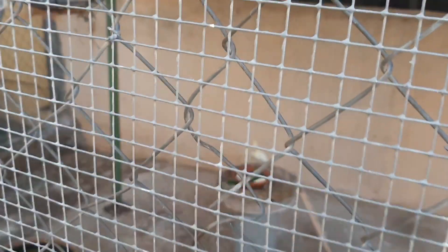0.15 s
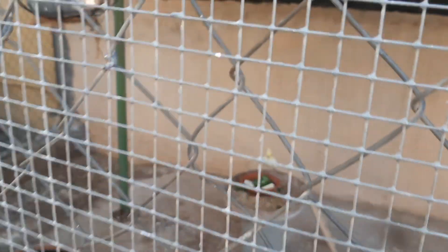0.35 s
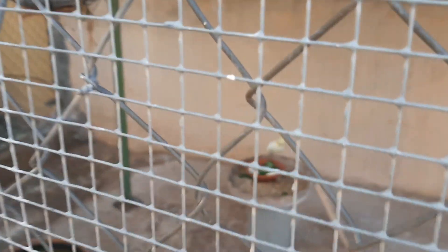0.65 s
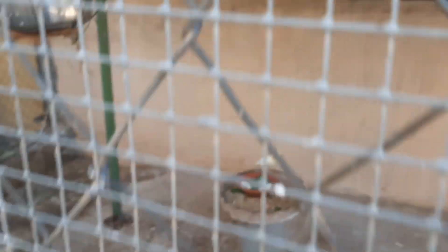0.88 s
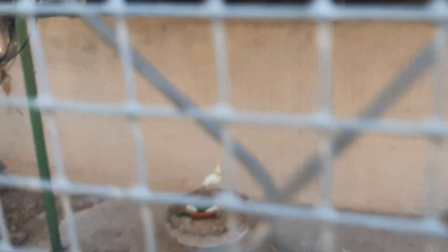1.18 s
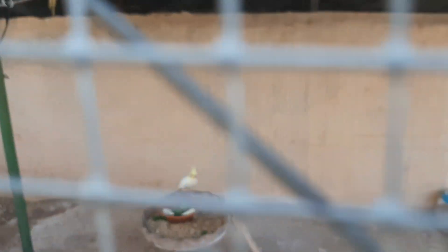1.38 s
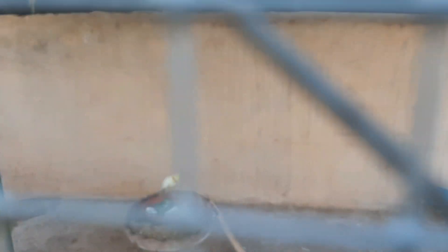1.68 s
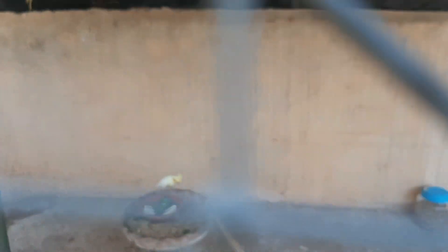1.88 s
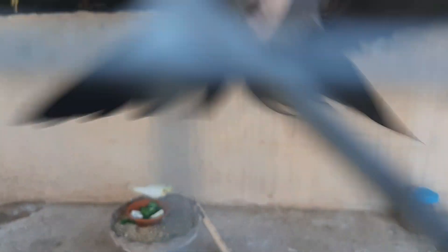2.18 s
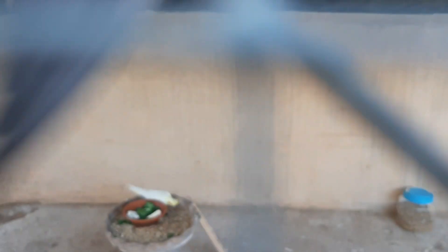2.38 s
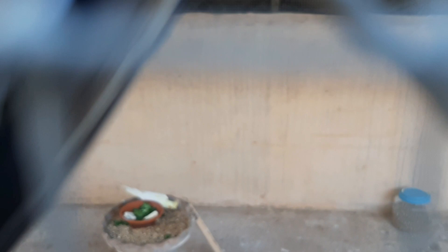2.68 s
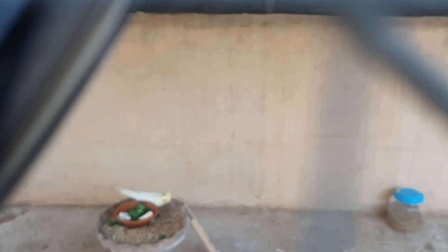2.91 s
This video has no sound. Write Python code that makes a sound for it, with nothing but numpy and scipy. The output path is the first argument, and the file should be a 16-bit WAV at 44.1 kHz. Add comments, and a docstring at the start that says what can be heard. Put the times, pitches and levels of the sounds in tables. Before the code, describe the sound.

Wing flutters from small parrots close by, broken by a hard bump and a brief warbling squawk.

```python
"""Parrots against the aviary mesh

Small parrots in a walled outdoor aviary: enveloped noise for wings, wind, hoarse bird sounds and a short
scuffle of feet, over a low outdoor rumble. Damped modes give perch knocks, wire pings and a sharp thump
on the right. Harmonic voices with moving pitch give far calls, a rough chirp and a near squawk that leaps
up and falls. Sound reaches a left and a right microphone port, with a diffuse answer from the walls."""
import sys
import numpy as np
from scipy import signal
from scipy.fft import rfft, irfft, next_fast_len
from scipy.io import wavfile
from scipy.ndimage import map_coordinates

SR = 44100
rng = np.random.default_rng(int(sys.argv[2]) if len(sys.argv) > 2 else 0)


def digitize_waveform(pressure):
    """Quantize a signal to 16-bit integers and store it at the path in sys.argv[1].

    Rows of a 2-D input are taken as channels; values are limited to [-1, 1].
    """
    field = np.atleast_2d(pressure).T
    bounded = np.clip(field, -1, 1)
    quanta = np.round(bounded * 32767).astype(np.int16)
    wavfile.write(sys.argv[1], SR, quanta)


N = 134505
TOP_HZ = 15900  # upper band limit

# treble response of the microphone, with a dip near 9 kHz: frequency_hz, gain_db
MICROPHONE = [(7700, 0), (8700, -15), (9700, -20), (11000, -1.5), (15000, -5.5)]


def amp(db):
    """Level: decibels to an amplitude ratio."""
    return 10 ** (np.asarray(db) / 20)


def unit(x):
    """Normalisation: scale each channel to rms 1."""
    return x / np.sqrt(np.mean(x ** 2, axis=-1, keepdims=True) + 1e-20)


def clock():
    """Sampling: the time of each sample in seconds."""
    return np.arange(N) / SR


def pan(left_minus_right_db):
    """Interaural level difference: left and right gains, shared evenly."""
    return amp(np.array([[left_minus_right_db], [-left_minus_right_db]]) / 2)


def along(points, hz):
    """Interpolation of (frequency, value) points along a logarithmic frequency axis."""
    f, v = np.transpose(points)
    return np.interp(np.log(hz + 1), np.log(f + 1), v)


def wobble(rate):
    """Random modulation: a smooth curve through rate random knots a second."""
    return map_coordinates(rng.standard_normal(N // 4), [clock() * rate], mode="wrap")


def filtered(x, response):
    """Linear filtering: multiply the spectrum by a response of frequency."""
    m = next_fast_len(N + SR // 2)
    frequency_hz = np.fft.rfftfreq(m, 1 / SR)
    return irfft(rfft(x, m) * response(frequency_hz), m)[..., :N]


def noise(spectrum, alike=0):
    """Partial coherence: coloured stereo noise of rms 1, sharing the power fraction alike."""
    w = rng.standard_normal((3, N))
    share = np.clip(alike, 0, 1)
    stereo = w[:2] * np.sqrt(1 - share) + w[2] * np.sqrt(share)
    return unit(filtered(stereo, lambda hz: amp(along(spectrum, hz))))


def swell(s, width):
    """Gaussian envelope: a bell centred on s with standard deviation width, in seconds."""
    return np.exp(-.5 * ((clock() - s) / width) ** 2)


def decay(s, t60):
    """Exponential decay: a sudden start at s, falling 60 dB in t60 seconds."""
    t = clock() - s
    return (t >= 0) * np.exp(-np.log(1000) * np.abs(t) / t60)


def ring(s, modes):
    """Modal superposition: damped sinusoids all struck at s."""
    return sum(amp(db) * decay(s, t60) * np.sin(2 * np.pi * hz * (clock() - s)) for hz, db, t60 in modes)


def placed(x, pan_db, wet_db):
    """Arrival-time difference and reverberation: right port first, plus a decaying diffuse tail."""
    # reverberation time of the walls: frequency_hz, t60_s
    walls = [(200, .3), (3000, 0.32), (6000, 0.32), (14000, 0.13)]
    hz, t, z = signal.stft(rng.standard_normal((2, SR // 2)), SR, nperseg=256)
    fade = np.exp(-np.log(1000) * t / along(walls, hz)[:, None])
    tail = signal.istft(z * fade, SR, nperseg=256)[1]
    tail = np.pad(tail / np.linalg.norm(tail[0]), ((0, 0), (200, 0)))  # 4.5 ms before the first answer
    x = x * np.ones((2, 1))
    wet = signal.fftconvolve(x, tail, axes=1)[:, :N]
    direct = np.array([np.pad(x[0], (20, 0))[:N], x[1]])  # left is 20 samples late
    return pan(pan_db) * (direct + amp(wet_db) * wet)


def voice(curve, partials_db, jitter, rough):
    """Source and filter: unsteady syrinx harmonics, brighter when louder, through the throat."""
    # resonance of the throat: frequency_hz, gain_db
    throat = [(1500, -2), (3700, -0.5), (5500, -5.5), (7700, -6.5), (8700, -24), (11000, -11), (15000, -14)]
    brighten = .4  # dB gained by overtones per dB of loudness
    s, hz, db = np.transpose(curve)
    pitch = np.interp(clock(), s, hz) * (1 + jitter * wobble(500))
    phase = 2 * np.pi * np.cumsum(pitch) / SR
    level_db = np.interp(clock(), s, db)
    bright = amp(brighten * (level_db - db.max()))
    tone = 0
    for k, partial_db in enumerate(partials_db, 1):
        partial = amp(partial_db) * np.sin(k * phase) * (k * pitch < TOP_HZ)
        tone = tone + partial * (bright if k > 1 else 1)
    level = amp(level_db) * (clock() > s[0]) * (clock() < s[-1])
    rough_tone = level * tone * (1 + rough * wobble(1800))
    return filtered(rough_tone, lambda f: amp(along(throat, f)))


def outdoors():
    """Ambient sound field: a steady, nearly coherent rumble and a more diffuse, slowly varying wash."""
    # spectrum of the rumble: frequency_hz, relative_db
    rumble = [(20, -25), (40, -8), (62, 4.5), (80, -2.5), (110, -11.5), (200, -27.5), (500, -59)]
    # spectrum of the wash: frequency_hz, relative_db
    air = [(20, -27), (50, -0.5), (150, -0.5), (350, -3), (600, -7), (900, -7), (1250, -15), (1600, -10.5),
           (2150, -12.5), (2900, -25.5), (5000, -24.5), (7500, -34.5), (8700, -56), (9800, -41),
           (12000, -34), (16000, -32)]
    # loudness of the wash before panning: time_s, level_db
    air_level = [(0, -48.5), (1.1, -50), (2.1, -45.5), (2.6, -49.5), (3.05, -54)]
    wash = amp(np.interp(clock(), *np.transpose(air_level))) * noise(air, alike=0.27)
    return amp(-47) * pan(-3.0) * noise(rumble, alike=0.94) + pan(-4.5) * wash


def wings():
    """Aerodynamic noise: strokes make grainy feather swishes; the nearest also sweep air."""
    # wing strokes before placement: peak_s, level_db
    strokes = [(0.018, -47), (.12, -48), (0.217, -46), (.32, -47), (.43, -49), (1.584, -43), (1.675, -42.5),
               (1.764, -41), (1.871, -42.5), (1.969, -43), (2.05, -42.5), (2.12, -43), (2.18, -40.5),
               (2.338, -42.5), (2.385, -38.5), (2.44, -42.5), (2.48, -52), (2.932, -58.5), (3.025, -67)]
    # spectrum of the feathers: frequency_hz, relative_db
    feathers = [(300, 1.5), (1500, -0.5), (2800, 0), (5000, -1), (7600, 0.5), (8700, -12.5), (9800, -8),
                (11500, -0.5), (15500, 1.5)]
    # air swept by the nearest strokes: peak_s, relative_db
    whooshes = [(1.8, -40.5), (1.91, -46), (2.004, -34.5), (2.106, -34.5)]
    # spectrum of the swept air: frequency_hz, relative_db
    swept_air = [(100, 4), (400, -4), (800, -6), (1400, -0.5), (2600, -7.5), (4500, -9.5), (8000, -25),
                 (15000, -38)]
    rise_s, fall_s = 0.014, 0.054
    t = clock()
    power = 0
    for s, db in strokes:
        envelope = np.where(t < s, swell(s, rise_s), np.exp(-np.abs(t - s) / fall_s))
        power = power + (amp(db) * envelope) ** 2
    grain = unit(noise(feathers, alike=0.13) * amp(2.0 * wobble(600)))
    swish = np.sqrt(power) * grain
    sweep = sum(amp(db - 4) * swell(s, 0.0098) for s, db in whooshes)
    whoosh = sweep * noise(swept_air, alike=0.28)
    return placed(swish + whoosh, pan_db=-5.5, wet_db=-8)


def rasps_and_scuffle():
    """Band-limited noise: Gaussian bands give hoarse bird sounds and a short scuffle of feet."""
    # noise bursts before placement, the one at .83 s a scuffle:
    # centre_s, duration_sigma_s, centre_hz, bandwidth_sigma_hz, level_db
    bursts = [(.2, .09, 5400, 180, -66), (.62, 0.12, 5640, 450, -63.5), (.83, 0.035, 5150, 1400, -59),
              (1.14, 0.041, 4300, 300, -58), (1.17, .035, 5370, 330, -51), (1.194, 0.021, 1950, 503, -46.5),
              (1.199, 0.012, 3100, 230, -35.5), (1.198, 0.0096, 5150, 450, -45.5),
              (1.215, 0.032, 6030, 3560, -56.5), (1.26, 0.074, 4500, 755, -56),
              (1.55, 0.018, 4670, 150, -55), (2.4, 0.03, 5200, 1100, -46), (2.482, 0.011, 3700, 220, -41.5)]

    def band(hz, width):
        """Spectral shaping: a Gaussian noise band heard through the microphone response."""
        def response(f):
            return amp(along(MICROPHONE, f)) * np.exp(-.5 * ((f - hz) / width) ** 2)
        return unit(filtered(rng.standard_normal(N), response))

    bands = sum(amp(db) * swell(s, length) * band(hz, width) for s, length, hz, width, db in bursts)
    return placed(bands, pan_db=-3, wet_db=-3)


def claw_ticks():
    """Impact noise: claws tick the wire as short, broadband decays."""
    # claw ticks, level before panning: start_s, level_db, left_minus_right_db
    ticks = [(0.395, -40, -1), (2.342, -32, 6), (2.398, -23, 16), (2.4023, -29, 13.5), (2.928, -52.5, -9)]
    return sum(amp(db) * pan(side) * decay(s, 0.014) for s, db, side in ticks) * noise(MICROPHONE)


def far_calls():
    """Distance cue: a wavering whistle and a nasal call with more reverberant than direct gain."""
    # whistle contour before placement: time_s, pitch_hz, level_db
    whistle = [(.47, 5000, -61), (.5, 5200, -53.5), (.53, 5850, -53), (.565, 5850, -61), (.6, 5760, -51.5),
               (.645, 5850, -65), (.68, 5710, -51.5), (.72, 5730, -67), (.76, 5850, -55), (.8, 5600, -73),
               (.86, 5390, -51.5), (.9, 5350, -65), (.99, 5250, -64)]
    # nasal contour before placement: time_s, pitch_hz, level_db
    nasal = [(2.77, 660, -68), (2.805, 638, -57.5), (2.85, 575, -66)]
    # harmonics of the nasal call, fundamental first: relative_db
    nasal_partials = [-25, -20, -13, -1.5, -4.5, -6, -7, -8, -8, -11, -14, -10]
    calls = voice(whistle, [0], jitter=0.01225, rough=0.36)
    calls = calls + voice(nasal, nasal_partials, jitter=0.0081, rough=.2)
    return placed(calls, pan_db=-4.0, wet_db=4.0)


def perch_knocks():
    """Modal excitation: feet knock on a perch and set its damped modes ringing."""
    # knocks before placement: start_s, level_db
    knocks = [(.792, -35), (.823, -36), (.831, -42)]
    # modes of the perch: frequency_hz, relative_db, t60_s
    perch = [(328, -6, 0.065), (405, -3, 0.042), (550, -7, .04), (910, -8, .03), (1410, -7, 0.028)]
    return placed(sum(amp(db) * ring(s, perch) for s, db in knocks), pan_db=-1.5, wet_db=-8)


def chirp():
    """Frequency modulation: a brief, rough, nearly pure tone on an unsteady pitch."""
    # chirp contour before placement: time_s, pitch_hz, level_db
    contour = [(1.183, 3000, -43), (1.189, 3270, -30), (1.195, 3213, -28), (1.2, 3320, -29),
               (1.21, 3282, -35), (1.222, 3346, -47.5), (1.23, 3400, -50)]
    return placed(voice(contour, [0, -25], jitter=0.0224, rough=0.21), pan_db=-11, wet_db=-12)


def wing_wind():
    """Turbulent pressure: wing wind puffs on each port independently; one buffet hits mainly the left."""
    # puffs at the ports: centre_s, duration_sigma_s, left_db, right_db
    draughts = [(1.7, 0.22, -46, -39.5), (1.925, 0.015, -40, -32), (2.025, 0.029, -38, -29.5),
                (2.133, 0.015, -31, -30.5), (2.201, 0.027, -40, -32), (2.335, 0.014, -28, -32),
                (2.385, 0.029, -23.5, -51), (2.454, 0.0092, -22.5, -46)]
    # spectrum of the puffs: frequency_hz, relative_db
    draught = [(15, -53), (30, -16), (52, 3.5), (90, -1), (150, -15), (300, -26), (700, -40), (2000, -43.5)]
    # spectrum of the buffet: frequency_hz, relative_db
    buffet_spectrum = [(40, -21), (120, 1), (175, 0.5), (210, 1.5), (260, -9), (440, -10.5), (650, -33),
                       (2000, -62)]
    gusts = sum(amp([[left], [right]]) * swell(s, width) for s, width, left, right in draughts)
    puffs = gusts * noise(draught)
    buffet = amp(-19.5) * swell(2.351, 0.017) * noise(buffet_spectrum)
    return puffs + buffet * amp([[0], [-33]])


def wire_pings():
    """Beating modes: struck wire gives thin, high, fluttering pings."""
    # pings before placement: start_s, level_db
    pings = [(1.583, -41), (1.73, -56)]
    # modes of the wire: frequency_hz, relative_db, t60_s
    wire = [(10310, 0, .16), (10420, -7, .12), (8650, -17, .15), (12900, -17, .1)]
    ringing = sum(amp(db) * ring(s, wire) for s, db in pings) * (1 + 0.36 * wobble(250))
    return placed(ringing, pan_db=-5.0, wet_db=1)


def thump():
    """Impact response: a bump beside the right port gives a crack, body modes and a mesh shudder."""
    # modes of the bumped camera body: frequency_hz, relative_db, t60_s
    body = [(54.4, -1.5, 0.15), (89, -3, 0.12), (121.4, -11, 0.1), (203, -21, 0.073), (330, -15.5, 0.11),
            (412, -9.5, 0.083), (513, -25, .04), (632, -16, 0.062), (788, -16.5, 0.053), (1476, -24, 0.04),
            (2220, -39, .015)]
    # sharp contacts, level before the left port's cut: start_s, level_db
    cracks = [(2.2236, -17), (2.2267, -27), (2.234, -36)]
    # spectrum of the shuddering mesh: frequency_hz, relative_db
    mesh = [(30, -30), (110, -2), (250, -5), (450, 3), (800, -12), (1200, -15), (2500, -35), (6000, -53)]
    start_s, rise_s = 2.2245, 0.0029
    low_cut_hz = 44  # bass roll-off of the microphone
    rise = 1 - np.exp(-np.abs(clock() - start_s) / rise_s)
    boom = filtered(amp(0.5) * rise * ring(start_s, body), lambda hz: (1j * hz / (low_cut_hz + 1j * hz)) ** 2)
    crack_spectrum = [(300, 4), (2000, 1), (7500, -1), (9000, -18), (12000, -2.5), (15000, -1)]  # Hz, dB
    crack = sum(amp(db) * decay(s, 0.017) for s, db in cracks) * noise(crack_spectrum)
    shudder = amp(-13) * rise * decay(start_s, 0.067) * noise(mesh)
    return (boom + shudder) * amp([[-32], [0]]) + crack * amp([[-11], [0]])


def squawk():
    """Harmonic synthesis: a near, warbling call whose pitch leaps up and falls away."""
    # squawk contour before placement: time_s, pitch_hz, level_db
    contour = [(2.356, 1480, -45), (2.365, 1633, -26.5), (2.373, 1412, -39), (2.386, 1753, -24),
               (2.394, 1562, -31), (2.403, 1701, -34), (2.411, 1965, -22.5), (2.418, 1730, -41),
               (2.427, 2084, -30.5), (2.434, 3027, -47), (2.448, 3290, -42), (2.459, 3680, -33),
               (2.471, 3785, -37), (2.476, 3560, -21.5), (2.492, 3683, -28.5), (2.501, 2918, -34),
               (2.512, 2050, -31.5), (2.522, 1690, -39)]
    # harmonics, fundamental first: relative_db
    partials = [-1.5, -4, -7, -5.5, -13]
    return placed(voice(contour, partials, jitter=0.0282, rough=0.23), pan_db=-7, wet_db=-9.5)


def scene():
    """Superposition: every source summed at the two ports."""
    background = outdoors()
    flight = wings() + wing_wind()
    contacts = claw_ticks() + perch_knocks() + wire_pings() + thump()
    calls = far_calls() + chirp() + squawk()
    return background + flight + rasps_and_scuffle() + contacts + calls


def record(dry):
    """Band limiting: nothing passes at or above TOP_HZ."""
    return filtered(dry, lambda hz: hz < TOP_HZ)


dry = scene()
out = record(dry)
digitize_waveform(out)
```